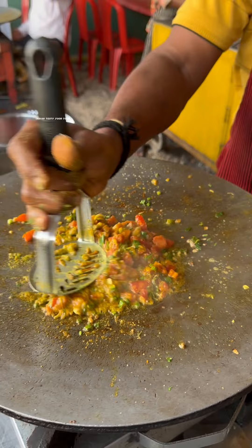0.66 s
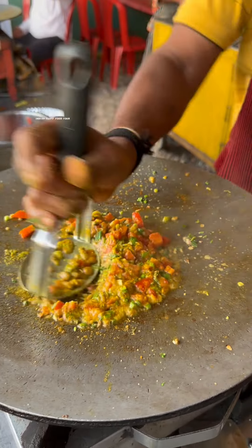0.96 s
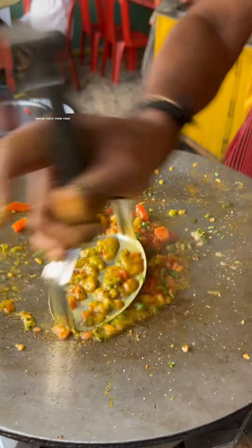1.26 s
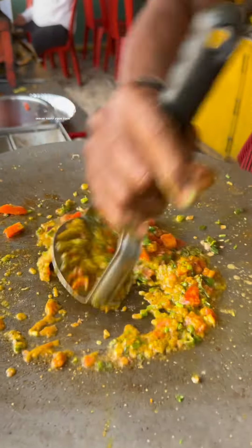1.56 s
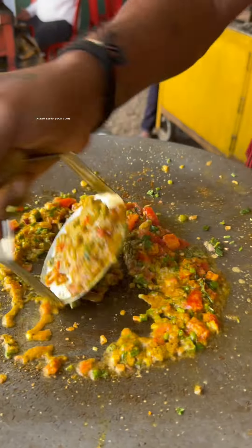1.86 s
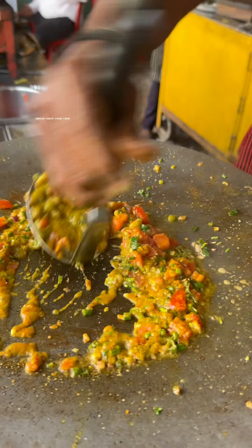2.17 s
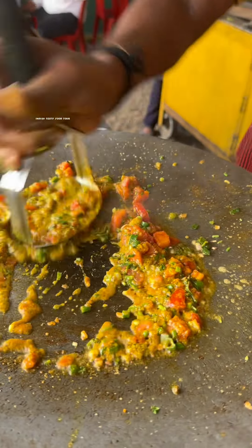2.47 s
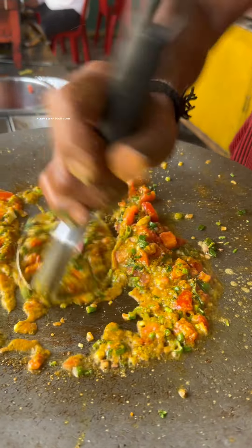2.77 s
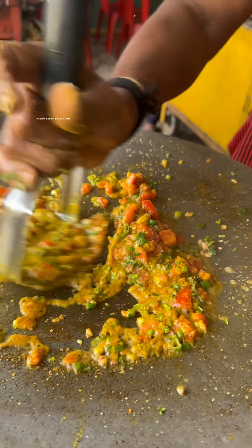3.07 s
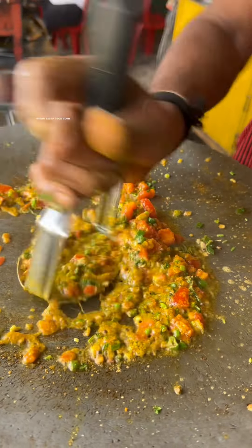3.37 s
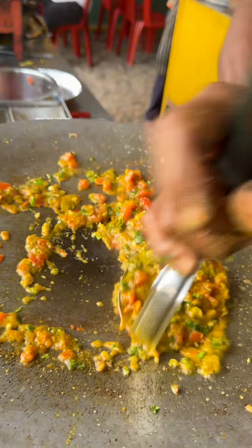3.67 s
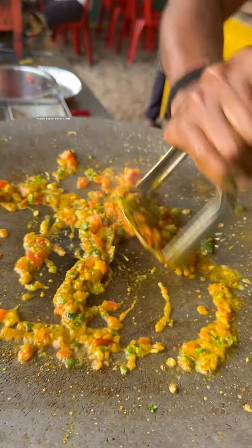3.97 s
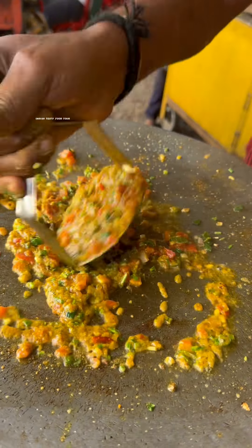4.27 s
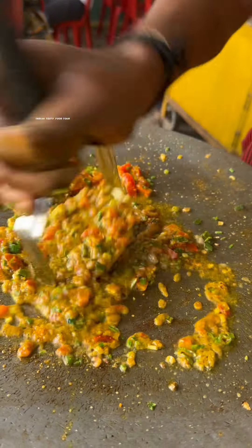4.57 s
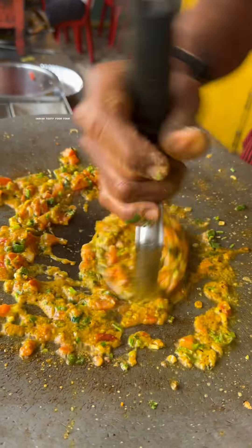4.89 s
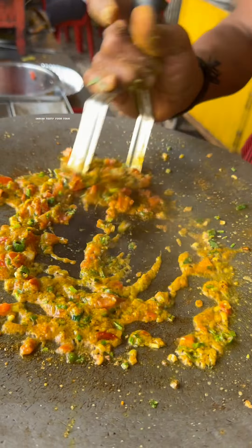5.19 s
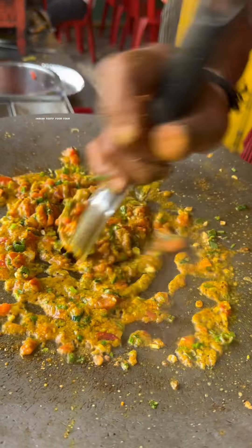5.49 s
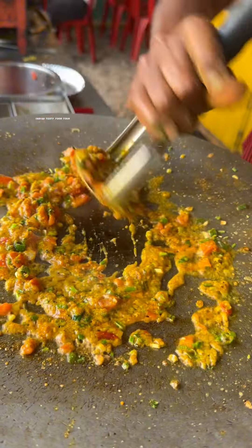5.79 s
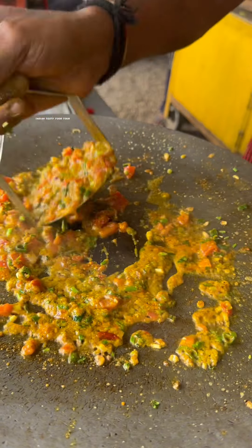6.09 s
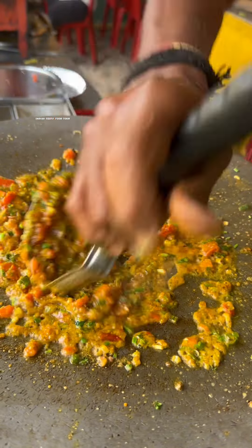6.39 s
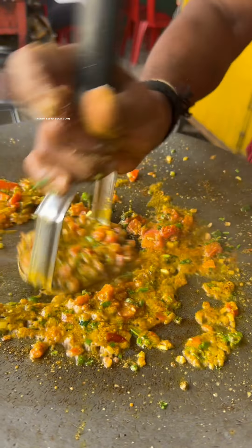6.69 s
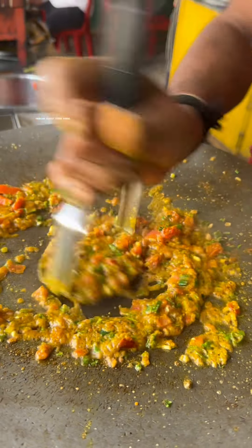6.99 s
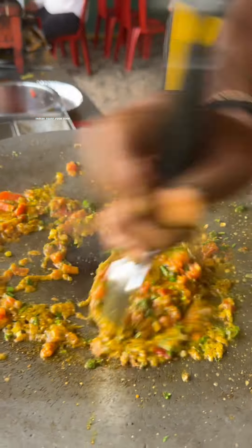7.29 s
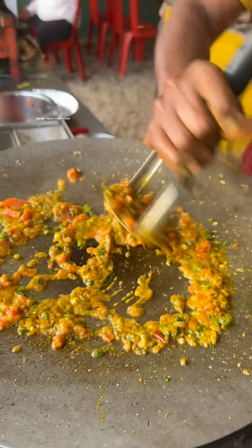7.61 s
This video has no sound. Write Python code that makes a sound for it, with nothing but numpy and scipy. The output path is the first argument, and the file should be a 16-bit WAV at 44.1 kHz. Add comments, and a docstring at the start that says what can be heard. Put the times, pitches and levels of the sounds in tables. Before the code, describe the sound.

Chopped vegetables sizzle close by on a big iron griddle, with a gas flame rumbling low underneath. The fizzing starts softly and grows in surges as a steel masher smears the food across the hot metal. The masher lands a few dull thuds through the food and clinks where its rim meets bare iron. In the second half its short scrapes come thicker, and the frying is loudest at the end.

```python
"""Chopped vegetables sizzle on a big iron griddle, heard close: their water boils out in tiny bubbles.
Turbulence in the gas flame rumbles underneath. A slotted steel masher spreads the food onto hot metal,
so the sizzle grows in surges. Its stick-slip friction keeps steel and plate faintly ringing; it thuds
where food cushions a blow, and clinks and scrapes where its rim meets bare iron."""
import sys
import numpy as np
from scipy import signal
from scipy.fft import rfft, irfft, next_fast_len
from scipy.io import wavfile
from scipy.ndimage import uniform_filter1d, map_coordinates

SR = 44100
rng = np.random.default_rng(int(sys.argv[2]) if len(sys.argv) > 2 else 0)


def generate_wav(signal):
    """Clip the signal to [-1, 1] and save it as 16-bit WAV at the path in sys.argv[1]."""
    frames = np.transpose(np.atleast_2d(signal))
    scaled = np.clip(frames, -1, 1) * 32767
    pcm = np.round(scaled).astype(np.int16)
    wavfile.write(sys.argv[1], SR, pcm)


N = 346185


def amp(db):
    """Amplitude ratio of a level in decibels."""
    return 10 ** (np.asarray(db) / 20)


def unit(x):
    """Normalisation to rms 1."""
    return x / np.sqrt(np.mean(x ** 2) + 1e-20)


def along(points, hz):
    """Interpolation of (frequency_hz, value) points on a logarithmic frequency axis."""
    knots_hz, values = np.transpose(points)
    return np.interp(np.log(hz + 1), np.log(knots_hz + 1), values)


def envelope(points):
    """Linear interpolation of (time_s, value) points at every sample."""
    return np.interp(np.arange(N) / SR, *np.transpose(points))


def bumps(rows):
    """Gaussian rises or dips of level from (centre_s, half_width_s, gain_db) rows."""
    return sum(db * np.exp(-((np.arange(N) / SR - s) / half) ** 2) for s, half, db in rows)


def wobble(rate_hz):
    """Slow random modulation: a spline through evenly spaced random values."""
    knots = rng.standard_normal(int(N * rate_hz / SR) + 4)
    return map_coordinates(knots, [np.arange(N) * rate_hz / SR])


def filtered(x, response):
    """Linear filtering: the spectrum is multiplied by a complex frequency response."""
    size = next_fast_len(N + SR // 2)
    return irfft(rfft(x, size) * response(np.fft.rfftfreq(size, 1 / SR)), size)[..., :N]


def add(track, start_s, sound):
    """Superposition of a sound on a track."""
    start = round(start_s * SR)
    track[..., start:start + sound.shape[-1]] += sound[..., :N - start]


def bursts(rate_hz, spread_db, rush_db):
    """Shot noise in two channels: random impulses of log-normal size over a smooth rush."""
    pops = (rng.random(N) < rate_hz / SR) * amp(spread_db * np.minimum(rng.standard_normal(N), 3))
    crackle = unit(pops * rng.choice([-1, 1], (2, N)))
    return unit(crackle + amp(rush_db) * rng.standard_normal((2, N)))


def ring(modes, t, scatter_db):
    """Free vibration: exponentially damped modes, their strengths scattered at random."""
    return sum(amp(db + scatter_db * rng.standard_normal() - 60 * t / t60) * np.sin(2 * np.pi * hz * t)
               for hz, db, t60 in modes)


# likeness of left and right: frequency_hz, coherence
COHERENCE = [(170, .97), (330, .62), (1300, .45), (2100, .87), (3300, .72), (6000, .45), (7700, .45),
             (8400, .8), (10000, .8), (10600, .95), (11600, .95), (11850, .6), (12500, .95), (13100, 1)]
# phase of left ahead of right: frequency_hz, lead_rad
LEFT_LEAD = [(300, 0), (1450, -.9), (1900, 0), (3200, .45), (4800, .3), (7550, 2), (7950, -.3), (9700, -.3),
             (10200, -1.2), (10450, -3.05), (11650, -3.14), (11780, 0)]
# level of left above right: frequency_hz, level_db
LEFT_EXCESS = [(150, .6), (400, 2.7), (1400, 2.5), (2200, .3), (6500, 2), (7700, 7), (8300, 2), (9200, 0)]

def placed(pair, spectrum=((100, 0), (10000, 0))):
    """Interaural coherence, level and phase place two coloured noises in stereo; their mean has rms 1."""
    def mid_side(hz):
        angle = np.arccos(np.clip(along(COHERENCE, hz), -1, 1)) / 2
        return amp(along(spectrum, hz)) * [np.cos(angle), np.sin(angle)]

    def left_right(hz):
        half = np.array([[.5], [-.5]])
        return amp(half * along(LEFT_EXCESS, hz)) * np.exp(1j * half * along(LEFT_LEAD, hz))

    mid, side = filtered(pair, mid_side)
    ears = filtered(np.array([mid + side, mid - side]), left_right)
    return ears / np.std(ears.mean(axis=0))


def shifting(pair, depth_db):
    """Spectral modulation: as food and masher move, narrow patches of the spectrum brighten and fade."""
    spectra = signal.stft(pair, nperseg=512)[2]
    patches = uniform_filter1d(rng.standard_normal(spectra.shape[1:]), size=3, axis=0)
    patches = unit(uniform_filter1d(patches, size=14, axis=1))
    return unit(signal.istft(spectra * amp(depth_db * patches), nperseg=512)[1][:, :N])


# steady growth of the frying: time_s, level_db
FRYING_BUILD = [(0, -14), (2.5, -10), (4.7, -4.5), (7.85, 0)]
# brief dips of the sizzle: centre_s, half_width_s, gain_db
SIZZLE_DIPS = [(.565, .04, -1.5), (1.03, .03, -1.8), (4.2, .15, -.7), (5.66, .03, -1.5)]
# spectrum of the coarse spitting: frequency_hz, density_db
SPIT_SPECTRUM = [(200, -38), (600, -10.5), (1000, -9.5), (1750, -7), (2100, -0.85), (3300, 0), (4300, -2),
                 (6500, -1.5), (9000, -5.5), (14000, -26)]
# spectrum of the fine fizz: frequency_hz, density_db
FIZZ_SPECTRUM = [(1500, -29), (4500, -13.5), (6400, -5.5), (7050, -1), (7600, -3.5), (8300, 1.5), (9500, 1),
                 (10800, -3), (12000, 0.5), (14500, 4.5), (15700, 2.5)]

def sizzle():
    """Boiling: bubbles burst over a rush of steam, more of them each second as the frying grows louder."""
    build_db = envelope(FRYING_BUILD) + bumps(SIZZLE_DIPS)
    flare_db = flares()
    fizz_db = -28.5 + .84 * build_db + flare_db
    spit_db = -32 + .9 * build_db + .22 * flare_db
    bubble_rate_hz = 9000 * amp(fizz_db - fizz_db.max())
    spit = placed(shifting(bursts(bubble_rate_hz, spread_db=3, rush_db=2), depth_db=1.27), SPIT_SPECTRUM)
    fizz = placed(shifting(bursts(bubble_rate_hz, spread_db=3.5, rush_db=2), depth_db=1.65), FIZZ_SPECTRUM)
    sputter = lambda: amp(.33 * wobble(40) + .18 * wobble(14))
    return amp(spit_db) * sputter() * spit + amp(fizz_db) * sputter() * fizz


# wet food spread onto hot iron: start_s, length_s, flare_db
FOOD_SPREADS = [(0.262, 0.45, 3), (0.74, 0.11, 5.5), (1.017, 1.55, 7.5), (2.598, 0.7, 6),
                (3.336, 1.08, 7.5), (4.446, 0.25, 6.5), (4.705, 0.54, 5.5), (5.266, 0.38, 5.5),
                (5.678, .55, 4), (6.271, 0.63, 5), (6.936, 0.5, 5.5), (7.435, 0.41, 4)]

def flares():
    """Evaporation lifts the sizzle, in dB, at each spread; it sags with drying and ends at lift-off."""
    attack_s, drying_s, release_s = .12, 2.3, .15
    t, total_db = np.arange(N) / SR, np.zeros(N)
    for start_s, length_s, flare_db in FOOD_SPREADS:
        age = np.maximum(t - start_s, 0)
        contact = np.minimum(age / attack_s, 1) * np.clip(1 - (age - length_s) / release_s, 0, 1)
        total_db += flare_db * contact * np.exp(-age / drying_s)
    return total_db


# strength of the flame's rumble: time_s, level_db
FLAME_LEVEL = [(0, -41.5), (1, -40.5), (3.4, -39.5), (4.4, -37.5), (7.85, -33.5)]
# brief swells and sags of the rumble: centre_s, gain_db
RUMBLE_SWELLS = [(.63, -5), (2.87, 3), (3.17, -3), (3.87, 2.5), (4.13, 4), (4.48, 3.5), (4.76, 4.5),
                 (5.2, 8.5), (5.84, 4), (6.29, 2.5), (6.72, 4)]
# spectrum of the flame: frequency_hz, density_db
FLAME_SPECTRUM = [(12, -45), (20, -33), (51, 0), (75, 0), (156, -5), (204, -16), (330, -27), (430, -40),
                  (730, -120)]

def burner():
    """Combustion noise: the gas flame rumbles and flickers; the low rumble briefly swells and sags."""
    swell_db = bumps([(s, .055, db) for s, db in RUMBLE_SWELLS])
    roar = placed(rng.standard_normal((2, N)), FLAME_SPECTRUM)
    roar = filtered(roar, lambda hz: amp(along([(25, -2), (45, -.5)], hz)))  # deepest bass rolled off
    flicker_db = wobble(18)
    return amp(envelope(FLAME_LEVEL) + swell_db + flicker_db) * roar


def slips(modes):
    """Stick-slip friction: a stream of tiny impulses excites modes that the contact damps."""
    t, contact_t60_s = np.arange(SR // 4) / SR, .1
    response = amp(-60 * t / contact_t60_s) * ring(modes, t, scatter_db=0)
    friction = bursts(300, spread_db=6, rush_db=2)
    return placed(signal.fftconvolve(friction, response[None], axes=1)[:, :N])


# spectrum of food being smeared: frequency_hz, density_db
SMEAR_SPECTRUM = [(150, -20), (320, -7), (420, -1), (700, -2), (1200, -0.5), (2000, -1.5), (5000, -74)]
# ring of the steel as the masher bears on bare iron: time_s, level_db
MASHER_PRESSURE = [(0, -12), (1.0, -11), (1.35, -5.5), (2.3, -5), (3, -7), (4.2, -8), (4.7, -6), (5.7, -5),
                   (6.2, -6.5), (7.85, -7)]
# modes of the masher on the plate, also struck in clinks: pitch_hz, level_db, t60_s
STEEL_MODES = [(1303, -2.5, .095), (1688, -5, .085), (2235, -11, .27), (2271, 0, .12), (2890, -10, .05),
               (3140, -8, .06), (3500, -9, .05), (4250, -4, .05)]
# low modes of the plate, also struck in thuds: pitch_hz, level_db, t60_s
PLATE_MODES = [(424, -3.5, 0.081), (470, -12, 0.047), (555, -6.5, 0.051), (607, -9, 0.041),
               (680, -16, 0.045)]

def rubbing():
    """Sliding friction: the masher smears the food and keeps steel and plate faintly ringing."""
    smear = placed(bursts(900, spread_db=5.5, rush_db=8), SMEAR_SPECTRUM)
    pressure_db = envelope(MASHER_PRESSURE) + 2.5 * wobble(9)
    metal = amp(pressure_db) * slips(STEEL_MODES) + amp(-16.5) * slips(PLATE_MODES)
    return amp(-41 + .81 * envelope(FRYING_BUILD)) * (smear + metal)


def drone():
    """Resonance: one randomly driven mode hangs behind the frying as a faint hollow tone."""
    pitch_hz, t60_s = 381, .14
    return amp(-63) * slips([(pitch_hz, 0, t60_s)])


# blows through the food: start_s, level_db, hardness_db_per_octave
CUSHIONED_BLOWS = [(.289, -48.5, 26), (2.026, -28.5, -2), (2.285, -31.8, -2), (2.487, -37.5, -5),
                   (4.120, -21.8, -5), (5.91, -42, -3), (6.505, -41, -6)]

def thuds():
    """Cushioned impact: a light first touch, then the full weight, rings the plate's low modes."""
    out, t = np.zeros((2, N)), np.arange(SR // 4) / SR
    lowest_hz, rise_s, pan = PLATE_MODES[0][0], .0034, amp([[1.5], [-1.5]])
    for start_s, level_db, hardness in CUSHIONED_BLOWS:
        modes = [(hz, db + hardness * np.log2(hz / lowest_hz), t60) for hz, db, t60 in PLATE_MODES]
        blow = amp(level_db + 7) * pan * ring(modes, t, scatter_db=2) * (1 - np.exp(-t / rise_s))
        add(out, start_s - .002, amp(-5) * blow)
        add(out, start_s + .0047, blow)
    return out


# steel striking bare iron: start_s, level_db, crack_db, favoured_hz, octave_loss_db, t60_ratio
RIM_STRIKES = [(.291, -41.5, -9, 1950, 9, 2), (1.421, -34, -3, 1200, 9, .9),
               (2.128, -33.5, -2, 1550, 20, .7), (2.7212, -24, 0, 2300, 5, .8),
               (3.8596, -30, -4, 1250, 10, .9), (4.9422, -31, -2, 2400, 7, 1), (5.765, -35, -8, 1200, 9, 1),
               (6.2856, -21.3, 9, 2400, 1.5, .9), (6.971, -19, -9, 1500, 32, .62)]

def clinks():
    """Hard impact: a crack, then modes ring and beat; each touch has its own favoured range and damping."""
    out, t = np.zeros((2, N)), np.arange(SR // 3) / SR
    rise_s, pan = .0015, amp([[1], [-1]])
    band = signal.butter(2, [2500, 3700], "bandpass", fs=SR, output="sos")
    chatter_decay = amp(-60 * t / .012) + amp(-17 - 60 * t / .06)
    knock = amp(-8) * np.sin(2 * np.pi * 800 * t) * amp(-60 * t / .008)
    for start_s, level_db, crack_db, favoured_hz, octave_loss_db, t60_ratio in RIM_STRIKES:
        modes = [(hz, db - octave_loss_db * np.log2(hz / favoured_hz) ** 2, t60 * t60_ratio)
                 for hz, db, t60 in STEEL_MODES]
        chatter = unit(signal.sosfilt(band, rng.standard_normal(len(t)))) * chatter_decay
        crack = amp(crack_db) * (chatter + knock)
        body = ring(modes, t, scatter_db=.5) * (1 - np.exp(-t / rise_s))
        add(out, start_s, amp(level_db - 5) * pan * (body + crack))
    return out


# the rim skidding on bare iron: centre_s, length_s, level_db, pitch_hz
RIM_SKIDS = [(.38, .04, -53, 2300), (.555, .06, -51, 2200), (.673, .051, -55, 1300), (.71, .06, -52, 865),
             (.83, .08, -54, 4300), (1.15, .2, -49, 4700), (1.32, .1, -49, 2150), (1.88, .1, -48.5, 2200),
             (2.12, .16, -50, 2300), (3.403, .043, -46, 2960), (3.72, .12, -47, 2200),
             (4.55, .11, -42, 2500), (4.79, .15, -39.5, 3000), (4.92, .16, -39, 2250), (5.1, .1, -43, 3000),
             (5.31, .09, -39.5, 3100), (5.52, .14, -41.5, 2400), (5.72, .16, -42, 2200),
             (5.95, .22, -42, 2300), (6.8, .16, -41, 2280), (7.11, .09, -37, 5400),
             (7.545, .07, -34.5, 3250)]

def scrapes():
    """Frictional excitation: quick slips of the rim swell and fade in a resonance set by its grip."""
    out, t = np.zeros((2, N)), np.arange(N) / SR
    grit = bursts(1500, spread_db=4, rush_db=-5)
    for centre_s, length_s, level_db, pitch_hz in RIM_SKIDS:
        swell = np.exp(-2 * ((t - centre_s) / length_s) ** 2)
        b, a = signal.iirpeak(pitch_hz, Q=3.4, fs=SR)
        out += amp(level_db) * swell * unit(signal.lfilter(b, a, signal.lfilter(b, a, grit)))
    return np.std(out) * placed(out)


def scene():
    """Superposition of the sources on and under the griddle."""
    return sizzle() + burner() + rubbing() + drone() + thuds() + clinks() + scrapes()


def record(dry):
    """Band limiting: an ideal low-pass filter removes the highest treble."""
    cutoff_hz = 15780
    return filtered(dry, lambda hz: hz < cutoff_hz)


dry = scene()
out = record(dry)
generate_wav(out)
```